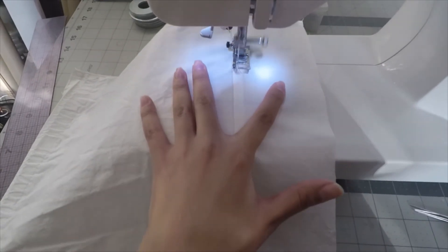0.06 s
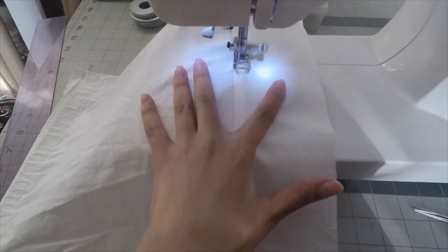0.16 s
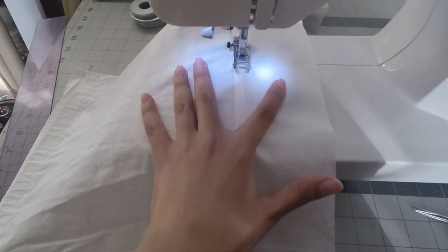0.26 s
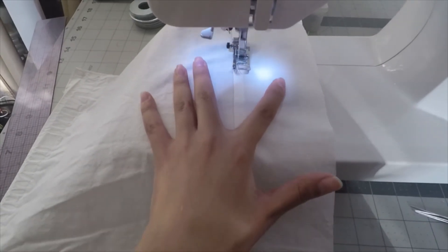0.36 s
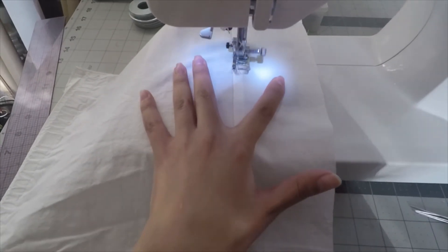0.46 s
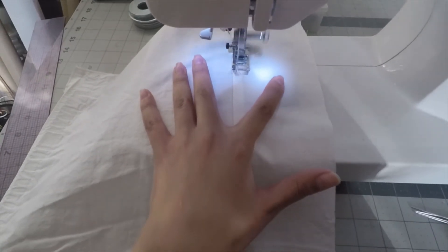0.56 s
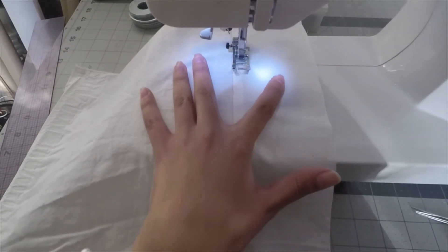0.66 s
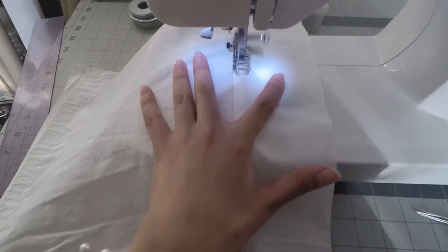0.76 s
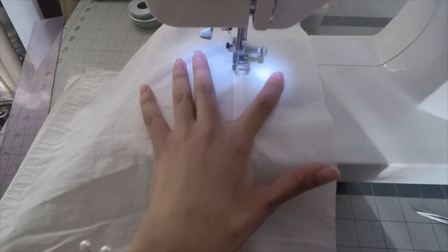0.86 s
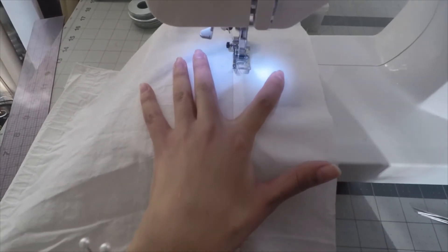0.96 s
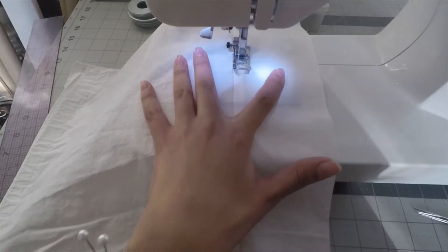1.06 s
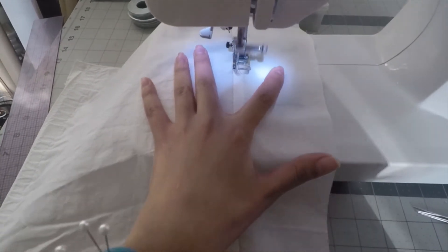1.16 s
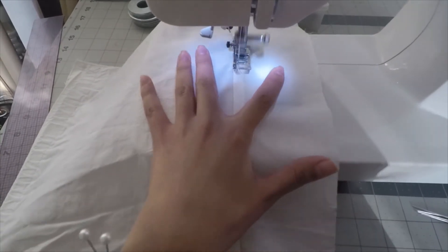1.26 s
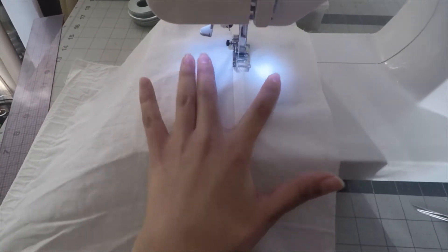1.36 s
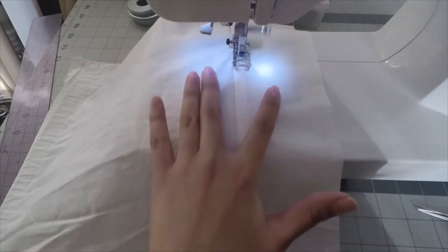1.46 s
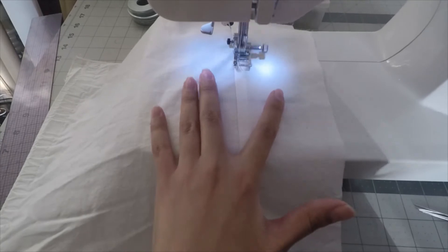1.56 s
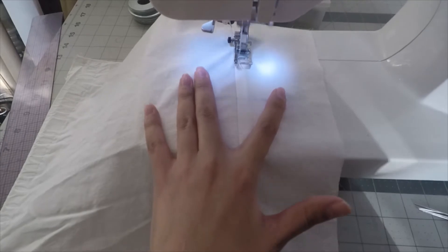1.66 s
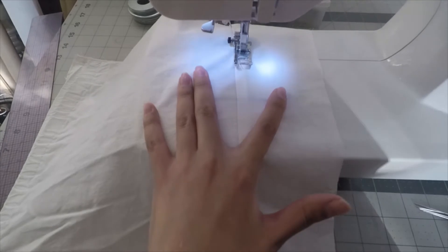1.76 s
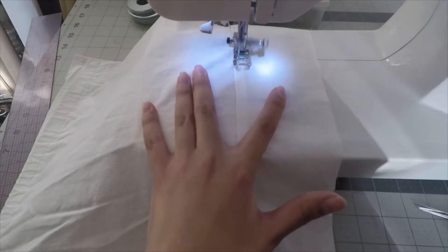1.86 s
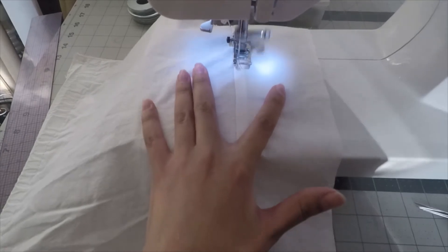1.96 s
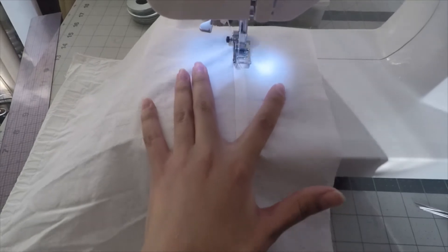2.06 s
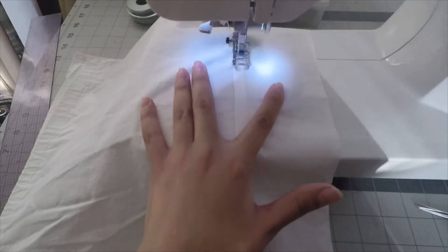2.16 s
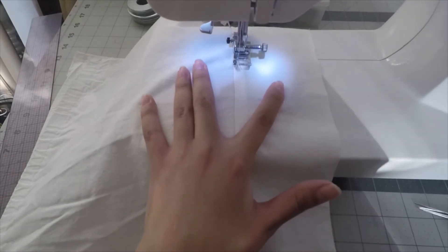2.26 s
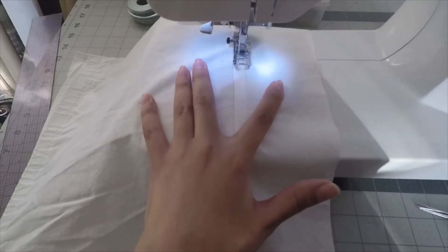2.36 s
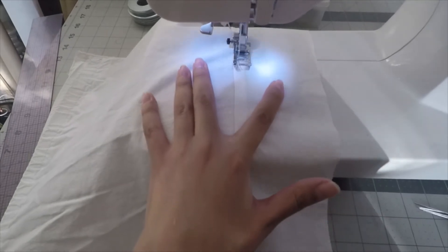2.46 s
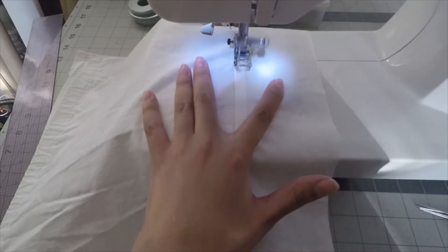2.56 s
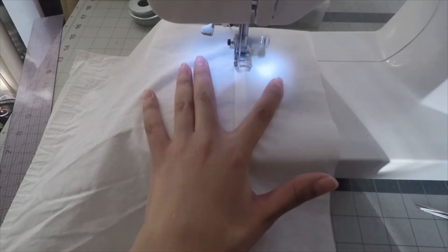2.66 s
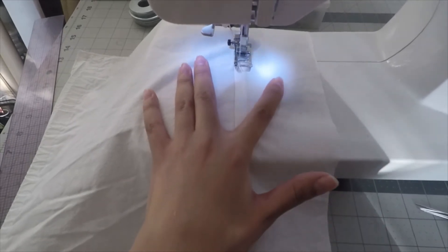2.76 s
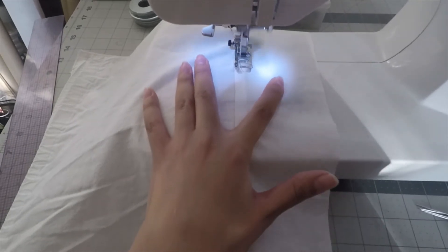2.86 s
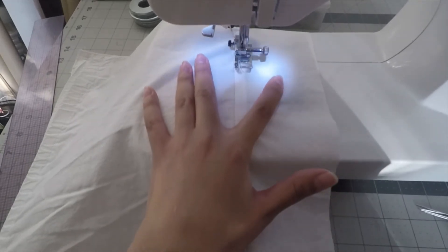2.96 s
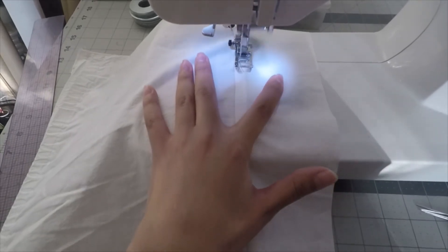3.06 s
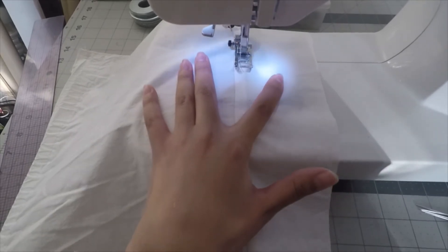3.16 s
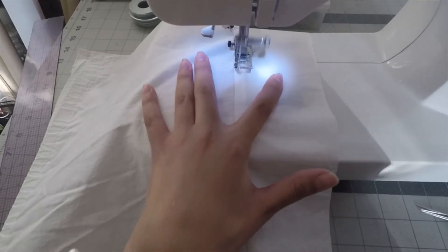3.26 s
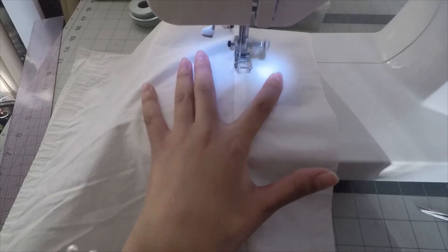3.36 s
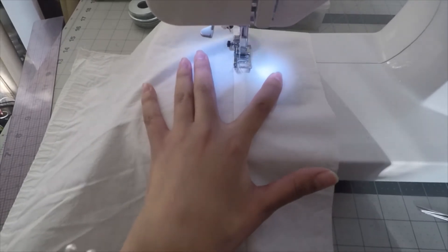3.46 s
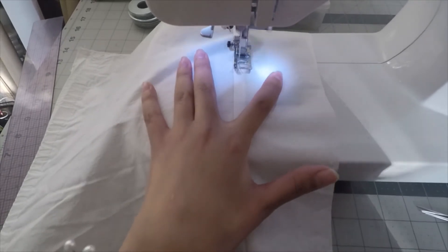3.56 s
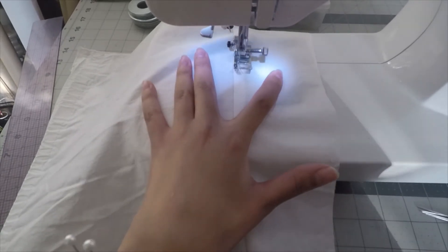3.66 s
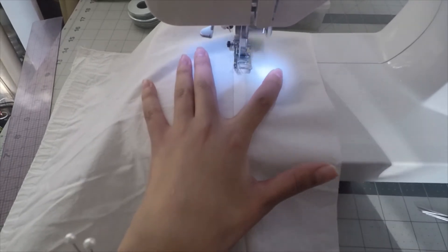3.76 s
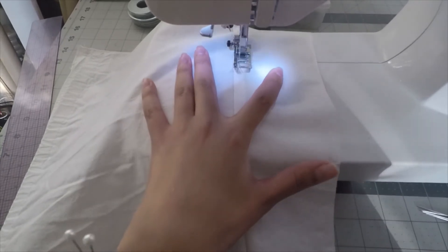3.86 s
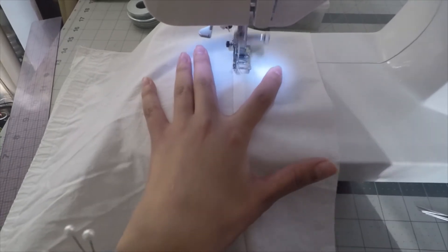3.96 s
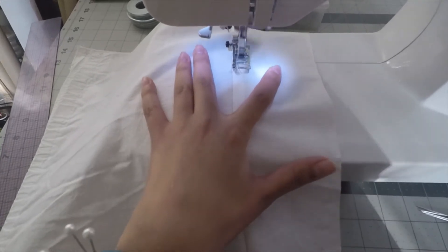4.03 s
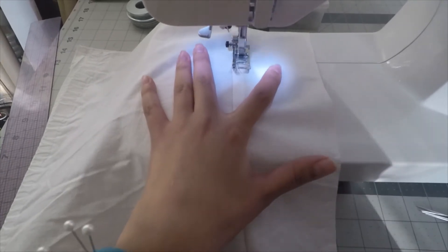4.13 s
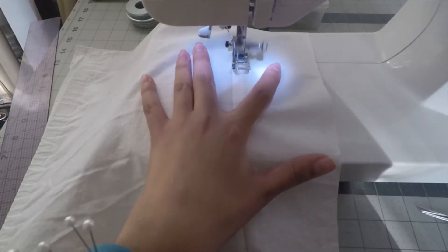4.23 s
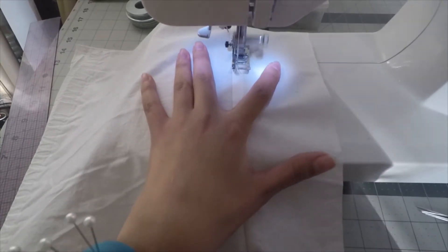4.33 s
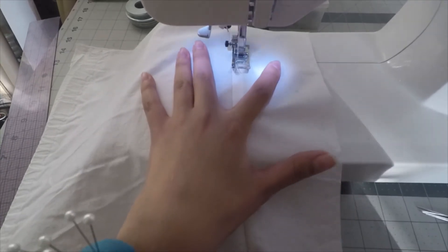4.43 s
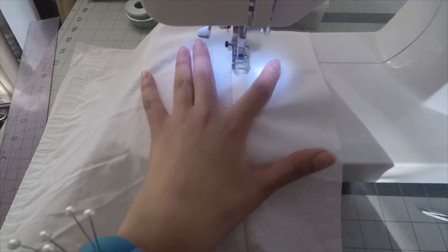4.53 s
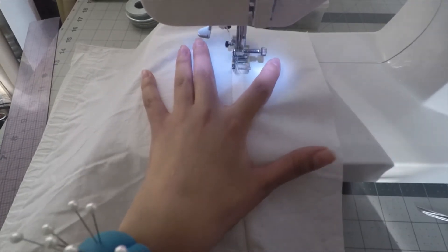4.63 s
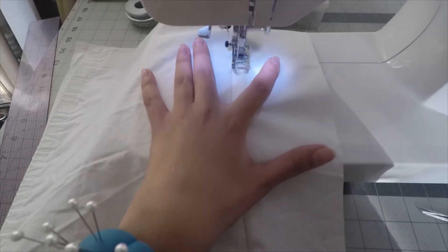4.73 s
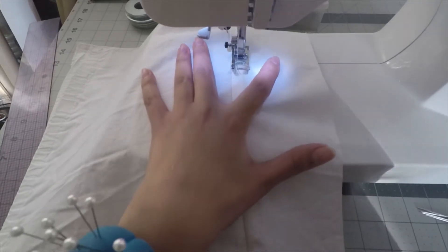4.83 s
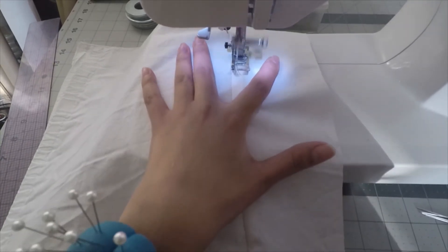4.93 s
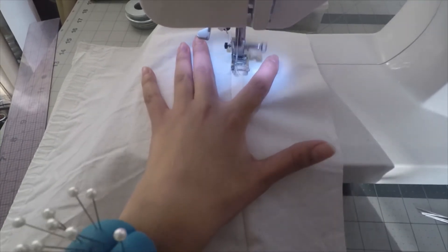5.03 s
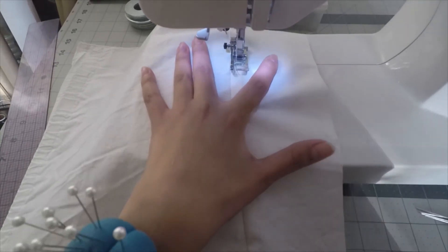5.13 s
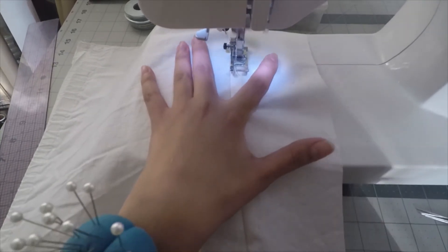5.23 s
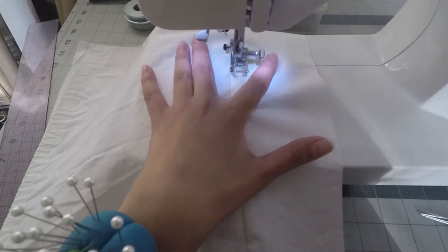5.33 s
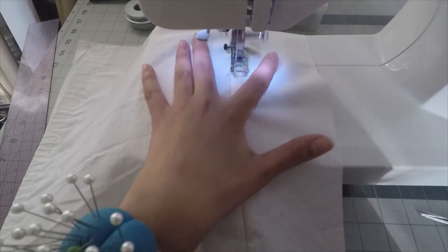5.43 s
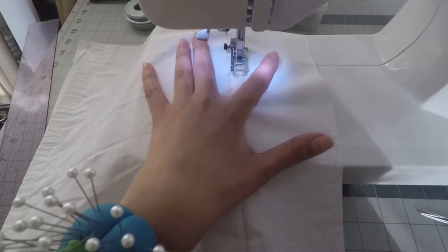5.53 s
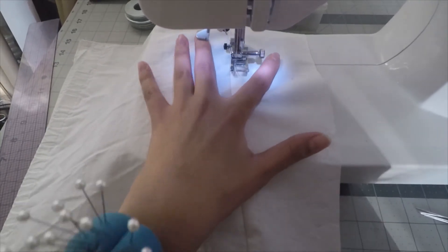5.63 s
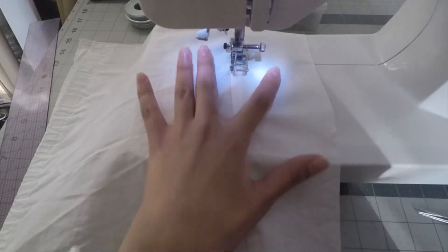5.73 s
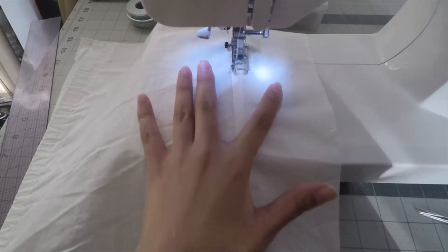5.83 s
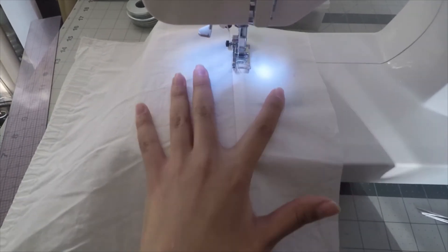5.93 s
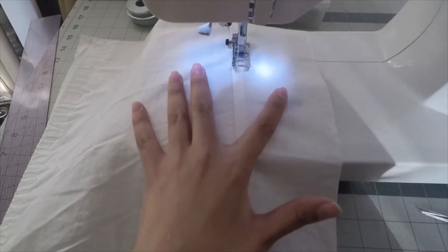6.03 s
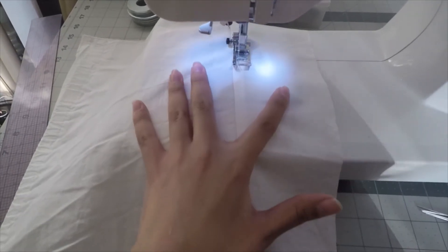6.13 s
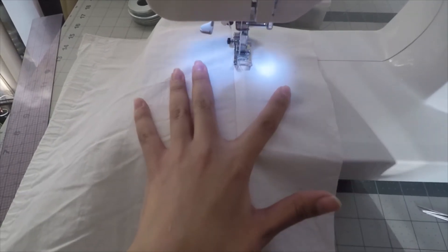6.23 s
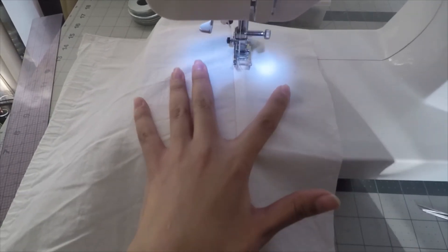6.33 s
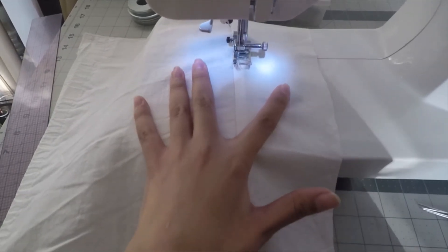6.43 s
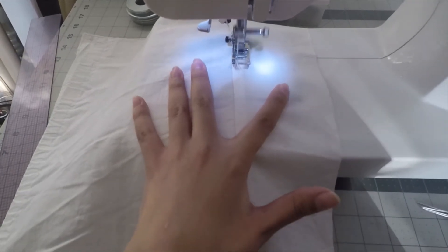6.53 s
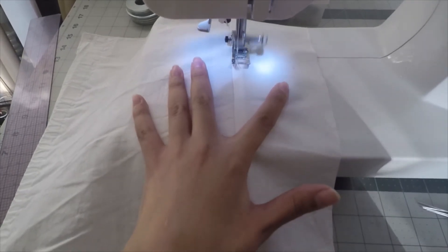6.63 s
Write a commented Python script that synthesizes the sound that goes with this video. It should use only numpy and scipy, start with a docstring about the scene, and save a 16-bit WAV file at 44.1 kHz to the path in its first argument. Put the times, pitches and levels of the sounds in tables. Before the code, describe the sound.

Close, rapid mechanical chugging of a sewing machine, about seven strokes a second, halts for a second of small clicks before restarting.

```python
"""In a quiet room an electric sewing machine stitches cloth about seven times a second, close to the microphone.
On every turn the needle bar and feed push and knock the body, which rings as a set of decaying modes.
Steel links rattle as bursts of noise grains, small parts ping as short sines, and the drive whirrs as steady noise.
It coasts to a stop, a few clicks and thumps sound while the cloth is guided, and it starts again.
Under it lie a short diffuse echo of the room, a wavering rumble and a faint hiss."""
import sys
import numpy as np
from scipy import signal
from scipy.fft import rfft, irfft, next_fast_len
from scipy.io import wavfile

SR = 44100
rng = np.random.default_rng(int(sys.argv[2]) if len(sys.argv) > 2 else 0)


def transcribe(u):
    """Save the signal u as a 16-bit wav file named by the first command-line argument.

    u: samples, shape (n,) or (channels, n), limited to [-1, 1]; the rate is SR.
    q: integer samples, one column per channel.
    """
    v = np.clip(np.atleast_2d(u).T, -1, 1)
    q = np.round(v * 32767).astype(np.int16)
    wavfile.write(sys.argv[1], SR, q)


N = 295029
T = np.arange(N) / SR
SIZE = next_fast_len(N + SR)
FREQS = np.arange(SIZE // 2 + 1) * SR / SIZE

# presses of the pedal: (start [s], release [s], motor effort at the start [dB])
PEDAL_PRESSES = [(-.1228, 5.56, .7), (6.485, 6.8, 4.5)]
COAST_S = 0.047  # how long the motor takes to die away


def undb(db):
    """Turn decibels into gain."""
    return 10 ** (np.asarray(db) / 20)


def over_hz(points):
    """Join (frequency [Hz], value) points on a log-frequency axis."""
    hz, value = np.transpose(points)
    return np.interp(np.log(FREQS + 1), np.log(hz), value)


def filtered(x, response):
    """Pass a sound through a frequency response."""
    return irfft(rfft(x, SIZE) * response, SIZE)[..., :N]


def colour(points, rings=()):
    """Make a response of unit mean power: a broad colour with resonances standing out of it."""
    peaks = sum(undb(db) / (1 + 2j * (FREQS - hz) / width) for hz, width, db in rings)
    response = undb(over_hz(points)) * (1 + peaks)
    return response / np.sqrt(np.mean(abs(response) ** 2))


def walk(rate):
    """Wander at random with a spread a little under 1, through `rate` joined points a second."""
    steps = rng.standard_normal(N // 4)
    return 0.97 * np.interp(T * rate, np.arange(len(steps)), steps)


def add(track, start, sound):
    """Mix a sound into a track from a given sample on."""
    lo, hi = max(start, 0), min(start + sound.shape[-1], N)
    if hi > lo:
        track[..., lo:hi] += sound[..., lo - start:hi - start]


def ports(likeness):
    """Make noise for the two microphone ports, partly shared (0 separate, 1 the same)."""
    share = np.clip(likeness, 0, 1)
    noise = rng.standard_normal((3, N))
    return np.sqrt(share) * noise[0] + np.sqrt(1 - share) * noise[1:]


def drive(s):
    """Motor effort in dB: it swells on a press, eases slightly as it runs and dies away on release."""
    spin_up_s, ease_db_per_s = 0.031, 0.1341
    gain = 1e-4  # floor at rest
    for start, release, db in PEDAL_PRESSES:
        running = np.maximum(s - start, 0)
        coasting = np.maximum(s - release, 0)
        swell = 1 - np.exp(-(running / spin_up_s) ** 2)
        fade = np.exp(-(coasting / COAST_S) ** 2)
        gain = gain + swell * fade * undb(db - ease_db_per_s * running)
    return 20 * np.log10(gain)


def stitches():
    """One needle stroke per turn of the shaft until it has coasted to rest: (time [s], force [dB])."""
    # speed of the main shaft, nearly steady and sagging into the stop: (time [s], speed [stitches/s])
    shaft_speed = [(0, 7.186), (1.33, 7.206), (1.58, 7.09), (2.13, 7.19), (2.83, 7.15), (3.73, 7.208),
                   (4.23, 7.174), (4.63, 7.232), (5.31, 7.185), (5.44, 6.88)]
    scatter_db = .5  # strokes differ a little in force
    times = []
    for s, release, _ in PEDAL_PRESSES:
        while s < release + 2 * COAST_S:
            times.append(s)
            s += 1 / np.interp(s, *np.transpose(shaft_speed))
    return list(zip(times, scatter_db * rng.standard_normal(len(times))))


def each_turn(strokes, table, jitter_s, scatter_db):
    """Repeat one turn's events for every stitch: (time [s], effort [dB], the table's other columns)."""
    chance = rng.standard_normal((len(strokes), len(table), 2))
    events = []
    for (s, force_db), draws in zip(strokes, chance):
        for row, (late, loud) in zip(table, draws):
            effort = force_db + drive(s + row[0]) + scatter_db * loud
            events.append((s + row[0] + jitter_s * late, effort, *row[1:]))
    return events


def body(strokes):
    """Blows ring the body's modes; a longer contact gives a duller push."""
    # pushes and knocks on the body in one turn: (time after the stroke [s], level [dB], contact time [s])
    turn_blows = [(-.0064, 18.6, .0158), (.0019, -.7, .0008), (.0057, -7, .001), (.0132, -13.9, .0009),
                  (.0237, -12.1, .001), (.0291, -8.4, .0029), (.0518, -6.4, .0035), (.0595, -9.4, .0068),
                  (.0788, -14, .0054), (.117, 5.5, .0118)]
    # thumps on the table around the stop: (time [s], level [dB], contact time [s])
    table_thumps = [(5.64, 19, 0.019), (5.672, 12.5, 0.016), (5.822, -10, .004), (5.832, -7.5, 0.0045),
                    (6.018, 8.5, 0.013), (6.345, -5, 0.0097), (6.473, -2.5, 0.0042)]
    # the machine body on its table: (frequency [Hz], level [dB], t60 [s])
    body_modes = [(52.4, -24, .178), (92, -4.9, .067), (131.5, -4.5, .25), (222, -28, .1),
                  (291, -12.6, .06), (418, -16.5, .09), (565, -15, .07), (718, -21.6, .065),
                  (861, -18.4, .059)]
    play_db = -50.5

    turns = each_turn(strokes, turn_blows, jitter_s=.0001, scatter_db=0.5)
    blows = [(s, effort + db, contact) for s, effort, db, contact in turns]
    force = np.zeros(N)
    for s, db, contact in blows + list(table_thumps):
        start = int(s * SR) - 1024  # the push rises ahead of its centre
        t = (start + np.arange(2048)) / SR - s
        push = np.exp(-(np.pi * t / contact) ** 2)
        add(force, start, undb(db) * push / push.sum())

    # play in the bearings shakes it a little at random
    shaking = filtered(rng.standard_normal(N), 1 / (1 + (FREQS / 250) ** 2))
    force += undb(play_db + drive(T)) * shaking

    t = T[:SR // 2]
    ring = np.zeros(len(t))
    for k, (hz, db, t60) in enumerate(body_modes):
        # neighbouring modes move the panel in opposite directions
        ring += (-1) ** k * undb(db) * np.sin(2 * np.pi * hz * t) * undb(-60 * t / t60)
    radiation = (1j * FREQS / (1j * FREQS + 40)) ** 2  # weak in the deepest bass
    return filtered(force, rfft(ring, SIZE) * radiation)


def rattle(bursts, steady_db, grain_db, likeness):
    """Clouds of tiny impacts that swell and die away, over the uneven chatter of the drive."""
    chatter_db = steady_db + drive(T) + 1.0 * walk(30) + 1.44 * walk(220)
    power = undb(2 * chatter_db)  # doubled dB gives power
    t = np.arange(-SR // 20, SR // 10) / SR
    for s, rise, decay, db in bursts:
        swell = np.exp(-2 * np.maximum(-t / rise, t / decay))
        add(power, int((s + t[0]) * SR), undb(2 * db) * swell)
    grains = undb(grain_db * walk(1300))
    return np.sqrt(power / np.mean(grains ** 2)) * grains * ports(likeness)


def linkage(strokes):
    """Each rattle sounds low in the plastic housing and bright in the steel links."""
    # rattles in one turn:
    # (time after the stroke [s], rise [s], decay [s], housing level [dB], steel level [dB])
    turn_rattles = [(-.002, 0.0076, .004, -24, -28), (.002, 0.0029, 0.006, -18, -20.5),
                    (.008, 0.0057, 0.026, -16.5, -28.5), (.036, .002, .005, -29, -38),
                    (.057, .0015, 0.009, -27, -33), (.087, 0.0042, 0.017, -27, -29.5),
                    (.101, .005, 0.013, -30, -36.5), (.113, 0.0031, 0.019, -31, -35.5)]
    # clicks while the machine stops, stands and starts:
    # (time [s], rise [s], decay [s], housing level [dB], steel level [dB])
    stop_clicks = [(5.593, 0.00084, .004, -32, -22), (5.814, 0.0011, 0.006, -33.5, -35.5),
                   (5.84, .004, 0.009, -31, -44), (5.976, .001, .005, -55, -39),
                   (6.0005, 0.00052, 0.0077, -23.5, -23.5), (6.163, 0.0051, 0.02, -36.5, -47),
                   (6.298, .0015, 0.005, -27.5, -33.5), (6.345, 0.0023, 0.017, -32, -44),
                   (6.37, .001, 0.005, -27, -35), (6.379, 0.0034, 0.0087, -21.5, -36),
                   (6.508, .001, .006, -40, -33), (6.541, 0.00077, 0.0083, -41, -22),
                   (6.582, 0.0013, .005, -28, -29)]
    # broad colour of the plastic housing and of the steel links: (frequency [Hz], level [dB])
    housing_colour = [(120, -21.5), (250, -1.5), (400, -3.5), (620, -2), (800, -6.5), (1200, -10.5),
                      (1600, -18), (2600, -31), (3500, -27.5), (6000, -33.5), (14000, -51.5)]
    steel_colour = [(600, -13), (1500, 0), (2700, 5.5), (3300, -2), (4900, -2), (6400, 2.5), (7600, -2.5),
                    (8200, -7.5), (9700, -8.5), (11500, -21), (13000, -23.5), (14500, -51)]
    # resonances of each: (frequency [Hz], width [Hz], level [dB])
    housing_rings = [(565, 29, -1), (731, 38, -4), (942.5, 7.7, 4.5), (1042, 7.7, -2), (1179, 9.2, -4.5),
                     (1925, 137, 10)]
    steel_rings = [(2840, 180, -15), (3560, 65, -2.5), (5790, 110, -7)]
    whirr_db, hiss_db = -27, -45  # steady drive noise in housing and steel

    turns = each_turn(strokes, turn_rattles, jitter_s=0.00071, scatter_db=1.36)
    hits = [(s, rise, decay, low + effort, high + effort) for s, effort, rise, decay, low, high in turns]
    hits = np.array(hits + list(stop_clicks))
    low = np.delete(hits, -1, axis=1)  # keeps the housing level
    high = np.delete(hits, -2, axis=1)  # keeps the steel level

    housing = rattle(low, steady_db=whirr_db, grain_db=0.5, likeness=0.78)
    # the large links sound alike at both ports; the small bright parts rattle on their own
    large = rattle(high, steady_db=hiss_db, grain_db=2.0, likeness=0.81)
    small = rattle(high, steady_db=hiss_db, grain_db=2.0, likeness=0.24)

    bright = 1 / (1 + (4700 / (FREQS + 1)) ** 8)  # share of power from the small parts
    steel = colour(steel_colour, steel_rings)
    plastic_sound = filtered(housing, colour(housing_colour, housing_rings))
    large_sound = filtered(large, steel * np.sqrt(1 - bright))
    small_sound = filtered(small, steel * np.sqrt(bright))
    return plastic_sound + large_sound + small_sound


def pings(strokes):
    """Needle, hook and thread guides ring briefly as decaying sines, never twice alike."""
    # small steel parts that ring in one turn:
    # (time after the stroke [s], frequency [Hz], level [dB], t60 [s], extra level scatter [dB])
    turn_pings = [(.079, 9470, -36, .022, 2), (.079, 10320, -39, .01, 2.5), (.079, 11400, -43, .009, 1.5),
                  (.087, 9450, -45, .03, 3), (.055, 5770, -40, .05, 3), (.095, 3770, -44, .1, 3.5),
                  (.002, 6350, -28, .025, 3), (.036, 6500, -36, .035, 3.5), (.056, 6600, -39, .035, 3.5)]
    # a single squeak, then high steel rings in the pause:
    # (time [s], frequency [Hz], level [dB], t60 [s])
    squeak_and_rings = [(4.562, 3660, -27, 0.11), (6.001, 9730, -30, 0.037), (6.039, 9550, -45, .05),
                        (6.059, 9550, -44, .04)]

    hits = []
    for s, effort, hz, db, t60, scatter in each_turn(strokes, turn_pings, jitter_s=0.0008, scatter_db=4.5):
        hits.append((s, hz, db + effort + scatter * rng.standard_normal(), t60))
    out, t = np.zeros((2, N)), T[:SR // 8]
    for s, hz, db, t60 in hits + list(squeak_and_rings):
        pitch = hz * (1 + 0.0154 * rng.standard_normal())
        lag = 0.2 * rng.standard_normal((2, 1))  # phase at each port, radians
        add(out, int(s * SR), undb(db - 60 * t / t60) * np.sin(2 * np.pi * pitch * t + lag))
    return out


def walls(x):
    """A short diffuse echo of the furnished room, different at each port and weak in the bass."""
    level_db, t60_s = -33, 0.54
    t = T[:SR // 3]
    echo = rng.standard_normal((2, len(t))) * undb(-60 * t / t60_s)
    echo *= t > .006  # the echo begins after 6 ms
    echo /= np.sqrt(np.sum(echo ** 2, axis=1, keepdims=True))
    treble = FREQS ** 2 / (FREQS ** 2 + 400 ** 2)
    return undb(level_db) * filtered(x, rfft(echo, SIZE) * treble)


def room():
    """A wavering rumble, much alike at both ports, under a faint diffuse hiss."""
    # colour of rumble and hiss together: (frequency [Hz], level [dB])
    room_colour = [(15, -7), (48, 1), (85, -8), (130, 2.5), (200, -8.5), (300, -15.5), (500, -24),
                   (740, -20), (1050, -39), (1600, -38), (2000, -39), (4200, -42.5), (5600, -41.5),
                   (7300, -40.5), (8600, -48), (14500, -59)]
    level_db = -26
    bass = 1 / (1 + (FREQS / 350) ** 2)
    response = colour(room_colour)
    rumble = filtered(ports(likeness=0.8), response * bass) * undb(1.9 * walk(4.14))
    hiss = filtered(ports(likeness=0.27), response * (1 - bass))
    return undb(level_db) * (rumble + hiss)


def scene():
    """The machine's panels reach the two near ports with different strength and phase."""
    # strength at the ports: (frequency [Hz], left minus right [dB])
    port_balance = [(60, 2), (170, 2), (290, 4), (470, 9.5), (650, 4.5), (850, 2), (1100, -0.5),
                    (1450, 0.5), (1900, -3), (2400, 1), (3200, -0.5), (4800, 0), (6200, 3.5), (7800, -2.5),
                    (12000, -5)]
    # phase at the ports: (frequency [Hz], lead of the left [radians])
    port_phase = [(170, 0), (340, 0.5), (440, 0.6), (560, 3), (700, 1), (860, 0.44), (1200, 1.14),
                  (1700, 1.5), (2300, -1), (2800, -1.1), (6000, 0.64)]

    sides = np.array([[1], [-1]])  # left, right
    gain = undb(sides * over_hz(port_balance) / 2)
    gain = gain / np.sqrt(np.mean(gain ** 2, axis=0))
    turn = np.exp(.5j * sides * over_hz(port_phase))
    strokes = stitches()
    machine = body(strokes) + linkage(strokes) + pings(strokes)
    return filtered(machine, gain * turn) + walls(machine) + room()


def record(dry):
    """The recorder rounds the highest peaks and cuts the top with a steep low-pass."""
    top_hz = 14300
    rounded = dry / (1 + (dry / .95) ** 6) ** (1 / 6)
    low_pass = signal.ellip(8, .2, 70, top_hz, fs=SR, output="sos")
    return signal.sosfilt(low_pass, rounded)


dry = scene()
out = record(dry)
transcribe(out)
```